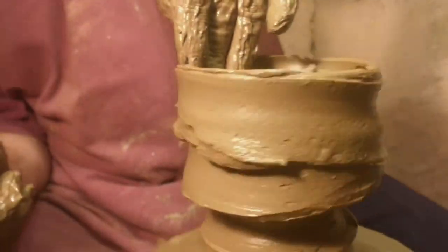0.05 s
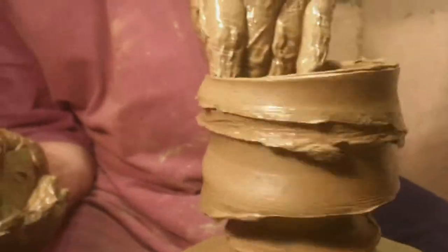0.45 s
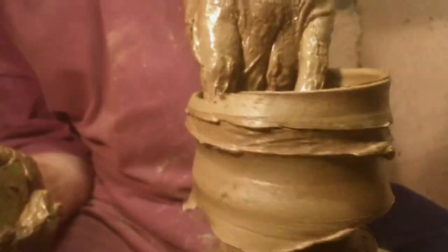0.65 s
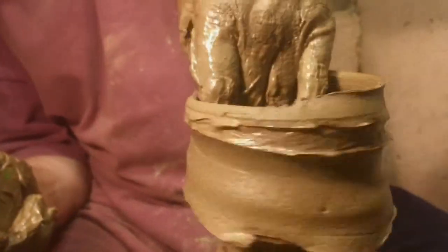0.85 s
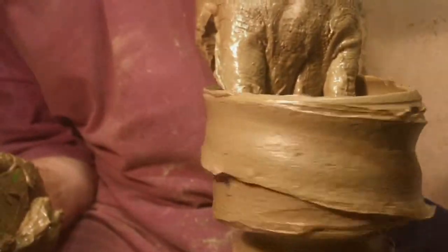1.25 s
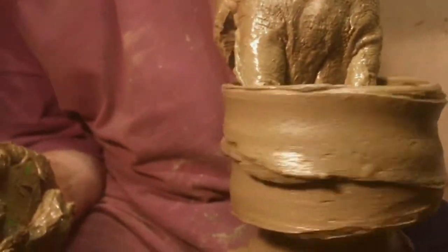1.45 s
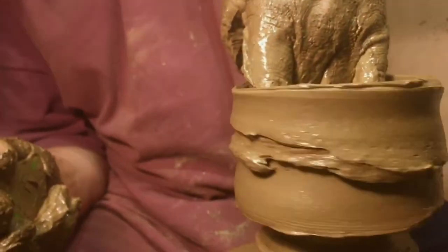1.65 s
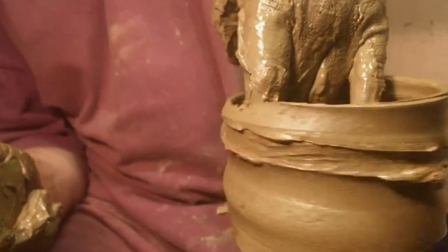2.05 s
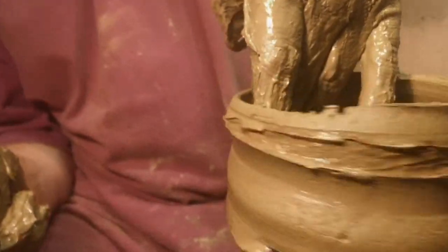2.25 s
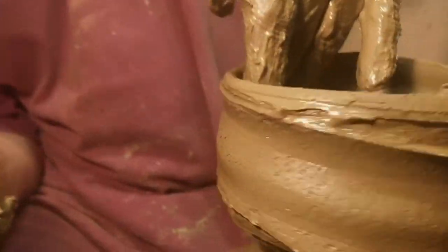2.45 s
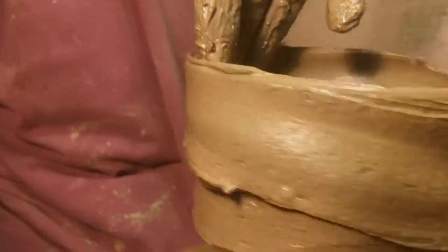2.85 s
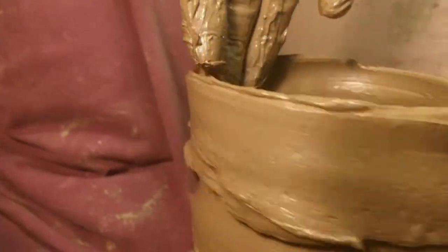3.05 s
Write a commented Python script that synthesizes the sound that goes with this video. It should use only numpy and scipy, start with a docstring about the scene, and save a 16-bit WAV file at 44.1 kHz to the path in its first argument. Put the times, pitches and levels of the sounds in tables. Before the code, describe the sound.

Wet clay is worked on a slowly turning potter's wheel, heard up close. Flurries of soft taps surround two dull knocks with brief gritty scuffs, while the wheel rumbles quietly under a thin hiss.

```python
"""Wet clay on a potter's wheel

Close to a slowly turning wheel, microphone in the hand. Working the clay gives flurries of soft taps,
two dull knocks, short scuffs and one tiny squeak. The blows travel through solid parts as bending
waves, treble first, so each falls in pitch. Behind them the wheel rumbles quietly under a thin hiss."""
import sys
import numpy as np
from scipy import signal
from scipy.fft import rfft, irfft
from scipy.io import wavfile
from scipy.ndimage import uniform_filter1d

SR = 44100
rng = np.random.default_rng(int(sys.argv[2]) if len(sys.argv) > 2 else 0)


def log_audio(samples):
    """Write samples as a 16-bit WAV file to the path given in sys.argv[1]."""
    # one column per channel
    frames = np.atleast_2d(samples).T
    # limit to full scale, then quantise
    limited = np.clip(frames, -1, 1)
    pcm = np.round(limited * 32767).astype(np.int16)
    wavfile.write(sys.argv[1], SR, pcm)


N = 136710

# spectrum of the wheel's rumble and shudder: f/Hz, level/dB
WHEEL_COLOUR = [(20, -52), (40, -24), (60, 0), (90, 2), (125, 0), (170, -3.5), (240, -3), (320, -7),
                (420, -13), (520, -13.5), (680, -18.5), (900, -40.5), (1500, -41), (3000, -58),
                (16000, -89)]
# spectrum of wet clay fizzing and splashing: f/Hz, level/dB
FIZZ_COLOUR = [(1000, -16), (3000, 2), (4400, -1), (5800, -0.5), (7500, -14), (10000, -18), (15000, -18)]
BEND_MS, KNOCK_BEND_MS = 0.844, 0.9  # travel time of a bending wave at 1 kHz
BUILD_UP_S = 0.0083  # rise of the rattle, boom and reflections after a blow


def undb(db):
    """Decibels to gain."""
    return 10 ** (np.asarray(db) / 20)


def colour(points, f):
    """Gain at the frequencies f of a spectrum of (f/Hz, level/dB) points."""
    hz, db = np.array(points, float).T
    return undb(np.interp(np.log(f + 1e-9), np.log(hz), db))


def noise(points):
    """Noise of a given colour, rms 1."""
    f = np.arange(N // 2 + 1) * SR / N
    y = irfft(rfft(rng.standard_normal(N)) * colour(points, f), N)
    return y / y.std()


def ring(hz, width_hz):
    """Noise ringing in one resonance, rms 1."""
    y = signal.lfilter(*signal.iirpeak(hz, hz / width_hz, fs=SR), rng.standard_normal(N))
    return y / y.std()


def walk(rate_hz):
    """Smooth random wander, spread near 1."""
    hold = int(SR / rate_hz)
    steps = rng.standard_normal(2048)[np.arange(N) // hold]
    return uniform_filter1d(uniform_filter1d(steps, hold), hold) * np.sqrt(2)


def curve(points):
    """Gain over time from (t/s, level/dB) points."""
    return undb(np.interp(np.arange(N) / SR, *np.array(points).T))


def fade(t, t60):
    """Exponential decay from t = 0, down 60 dB after t60 seconds."""
    return (t >= 0) * np.exp(-np.log(1000) * np.maximum(t, 0) / t60)


def add(out, start, sound):
    """Mix a sound in at a time in seconds."""
    i = int(round(start * SR))
    out[i:i + len(sound)] += sound[:N - i]


def blow(points, contact_ms, bend_ms, size=4096):
    """One push, peak 1: longer contact is duller; bending waves lag as 1 / sqrt(f), so it chirps down."""
    f = np.arange(size // 2 + 1) * SR / size
    khz = f / 1000
    gain = colour(points, f) / np.sqrt(1 + (khz * contact_ms) ** 10)
    cepstrum = irfft(np.log(gain + 1e-6))
    minimum_phase = np.exp(rfft(2 * cepstrum[:size // 2], size) - cepstrum[0])
    lead_ms = min(0.48, bend_ms) / 4  # brings the whole chirp forward
    lag_cycles = 2 * bend_ms * np.sqrt(khz) - lead_ms * khz
    y = irfft(minimum_phase * np.exp(-2j * np.pi * lag_cycles))[:size // 2]
    return y / np.abs(y).max()


def wheel():
    """The turning wheel rumbles unevenly and keeps a few resonances ringing."""
    # course of the rumble: t/s, level/dB
    rumble_level = [(0, -57), (.15, -55), (.3, -53), (.5, -53.5), (.63, -60), (.72, -58), (.87, -57),
                    (1.07, -59.5), (1.16, -57.5), (1.3, -61.5), (1.5, -54.5), (1.72, -58.5), (2, -59.5),
                    (2.3, -58.5), (2.45, -54.5), (2.7, -55.5), (2.83, -51.5), (3.1, -56.5)]
    # wheel resonances: f/Hz, width/Hz, level/dB relative to that course
    resonances = [(98.3, 15, -11.5), (125.5, 9.5, -9), (310.8, 10, -12), (367.3, 14, -14), (420, 13, -17.5),
                  (1621, 70, -29)]
    flutter_db = 2.5
    rumble = undb(-1.5) * noise(WHEEL_COLOUR) * undb(flutter_db * walk(rate_hz=39.92))
    ringing = sum(undb(db) * ring(hz, width) for hz, width, db in resonances)
    return curve(rumble_level) * (rumble + ringing)


def hiss():
    """Thin, flickering hiss that swells twice: full-bodied at the start, brighter near the end."""
    # spectra of the steady bed and the two swells: f/Hz, level/dB
    bed_colour = [(100, 9.5), (1000, 6.5), (1900, 4.5), (3000, 1), (5000, -1.5), (7600, -1.5), (8700, -7),
                  (10200, -1), (11000, -5), (12300, -2.5), (13500, -7), (15500, -2.5)]
    full_colour = [(200, -24), (1000, 7), (1500, 6), (1800, 10.5), (2200, 5), (3000, 6), (4200, 0.5),
                   (6000, 1.5), (7800, 0), (8500, -1.5), (12000, -1), (15500, -7)]
    bright_colour = [(200, -11), (1000, 8.5), (2600, 3.5), (4200, -1), (6000, 3.5), (7900, 7), (8300, -2),
                     (12000, 1), (15500, 0)]
    # course of each swell: t/s, level/dB
    full_level = [(0, -68), (.11, -69), (.17, -67), (.22, -73), (.28, -93), (.4, -130)]
    bright_level = [(2.5, -120), (2.66, -88), (2.73, -76.5), (2.79, -70), (2.89, -73.5), (2.96, -70),
                    (3.02, -75.5), (3.1, -99)]
    bed_db, flicker_db = -73, 1.13
    swells = curve(full_level) * noise(full_colour) + curve(bright_level) * noise(bright_colour)
    return (undb(bed_db) * noise(bed_colour) + swells) * undb(flicker_db * walk(rate_hz=150))


def taps():
    """Each tap is a dull falling thud with a small tick on top; reflections trail it briefly."""
    # soft handling taps: t/s, thud level/dB, contact/ms, tick level/dB
    touches = [(0.018, -37.5, 1.55, -51), (0.033, -45, 2.25, -63), (0.039, -38, 1.9, -56),
               (.053, -38, 1.6, -56), (0.062, -49, 1.9, -68), (.201, -43.5, 1.45, -59),
               (0.206, -39, 1.86, -64), (0.22, -40, 1.8, -63), (.232, -38.5, 1.64, -62),
               (0.2514, -30.5, 1.7, -54), (.271, -35, 1.7, -73), (0.304, -34.5, 1.83, -53),
               (0.3117, -41, 2.1, -49.5), (0.326, -37, 2.1, -69), (0.335, -46, 1.3, -70),
               (0.3514, -33.5, 2, -65), (0.4965, -36, 1.5, -49), (.513, -34.5, 1.33, -49),
               (0.545, -39.5, 1.75, -57), (0.66, -38.5, 1.63, -57), (1.129, -49.5, 1.6, -74),
               (1.457, -44.5, 2.4, -70), (2.083, -42.5, 1.93, -63), (2.117, -52, 1.4, -71),
               (2.157, -45, 3.1, -71), (2.176, -44.5, 3.45, -70), (2.217, -47, 1.46, -65),
               (2.34, -42.5, 4.4, -66), (2.384, -48.5, 1.7, -68), (2.4109, -35.5, 1.68, -56.5),
               (2.426, -39.5, 1.65, -60), (2.434, -37.5, 2.2, -58), (2.443, -42, 1.54, -67),
               (2.451, -41, 1.35, -58), (2.4597, -35.5, 1.6, -58), (2.51, -29.5, 1.67, -53),
               (2.518, -42, 1.7, -69), (2.552, -37.5, 1.78, -66), (2.572, -35.5, 1.4, -54),
               (2.5797, -43, 1.3, -46.5), (2.589, -38.5, 2.9, -48.5), (2.604, -35.5, 1.5, -58),
               (2.645, -43.5, 1.86, -60), (2.652, -43.5, 3.6, -57), (2.6905, -42, 1.43, -56),
               (2.698, -41, 1.36, -59), (2.7635, -36, 2.06, -64), (2.786, -41, 1.83, -67),
               (2.800, -40, 1.54, -58), (2.808, -38.5, 3.1, -62), (2.820, -42, 2.05, -63),
               (2.858, -44.5, 1.7, -73), (2.9098, -37, 1.77, -68), (2.931, -39, 1.48, -73),
               (2.937, -39, 1.43, -64), (2.943, -42, 1.05, -51.5), (2.989, -38, 2.5, -64),
               (3.027, -37, 1.7, -60)]
    # spectra of the thud and the tick: f/Hz, level/dB
    thud_colour = [(10, -59), (25, -40.5), (50, -17.5), (90, 1), (160, 4.5), (300, 0.5), (450, -2),
                   (1000, -8), (16000, -20.5)]
    tick_colour = [(30, -41), (100, -9), (500, 5), (900, -0.5), (1600, 2), (2600, -13), (4000, -24),
                   (8000, -24), (16000, -53)]
    out = np.zeros(N)
    bends = BEND_MS * np.exp(0.12 * rng.standard_normal(len(touches)))  # taps land at different distances
    for (start, thud_db, contact_ms, tick_db), bend_ms in zip(touches, bends):
        add(out, start, undb(thud_db) * blow(thud_colour, contact_ms, bend_ms))
        add(out, start, undb(tick_db) * blow(tick_colour, 0, bend_ms))
    t = np.arange(SR // 4) / SR
    tail = rng.standard_normal(len(t)) * fade(t, t60=0.15) * (1 - np.exp(-t / BUILD_UP_S))
    reflections = signal.fftconvolve(out, tail / np.linalg.norm(tail))[:N]
    return out + undb(-27) * reflections


def knocks():
    """Two hard blows make the frame boom and rattle and the wet clay splash; softer pushes thud low."""
    # hard blows: t/s, level/dB, contact/ms, rattle level/dB, boom level/dB, splash level/dB
    hits = [(0.438, -18.5, 0.4, -30, -40, -64), (1.5735, -25, 0.37, -36, -45.5, -76)]
    # soft low thuds, some just after the knocks, others as a scuff pushes and lets go:
    # t/s, level/dB, contact/ms
    soft_thuds = [(0.4443, -38.5, 0.98), (0.451, -41, 1.1), (0.458, -34, 1.35), (0.467, -38, 4.4),
                  (0.478, -37, 4.1), (.511, -46, 5.1), (1.5857, -33.5, 0.89), (1.595, -34, 1.6),
                  (1.621, -43, 6.8), (1.642, -37, 1.83), (1.646, -41, 6.9)]
    # modes of the frame: f/Hz, level/dB relative to the boom, t60/s
    frame_modes = [(95.4, 1.5, 0.27), (118.8, -7, 0.37), (199, -5.5, 0.21), (254, -10, 0.13),
                   (490, -6, 0.053), (760, -3, 0.064)]
    # spectra of the knock and the rattle: f/Hz, level/dB
    knock_colour = [(10, -55), (25, -41), (60, 0.5), (110, 4), (180, 3.5), (350, -1), (550, -7.5),
                    (900, -13.5), (1500, -21), (3000, -32.5), (6000, -31), (16000, -13)]
    rattle_colour = [(20, -45), (45, -36), (90, 8), (300, 6.5), (600, 4), (1100, -0.5), (2000, -11),
                     (3200, -27), (6500, -44), (10000, -56), (16000, -62)]
    out, rattle, splash = np.zeros(N), noise(rattle_colour), noise(FIZZ_COLOUR)
    for start, db, contact_ms, rattle_db, boom_db, splash_db in hits:
        t = np.arange(N) / SR - start
        add(out, start, undb(db) * blow(knock_colour, contact_ms, KNOCK_BEND_MS))
        boom = sum(undb(mode_db) * np.sin(2 * np.pi * hz * t) * fade(t, t60)
                   for hz, mode_db, t60 in frame_modes)
        build_up = 1 - np.exp(-np.maximum(t, 0) / BUILD_UP_S)
        out += build_up * (undb(rattle_db) * rattle * fade(t, t60=0.08) + undb(boom_db) * boom)
        out += undb(splash_db) * splash * fade(t, t60=0.094)
    for start, db, contact_ms in soft_thuds:
        add(out, start, undb(db) * blow(knock_colour, contact_ms, KNOCK_BEND_MS))
    return out


def scuffs():
    """Short gritty slips that let go with a sticky snap; fine fizz on top, a low shudder around each."""
    # slips: peak t/s, rise/s, fall/s, grit level/dB, fizz level/dB, shudder level/dB, snap level/dB
    slips = [(0.503, 0.0045, 0.0064, -59.5, -70, -44, -67),
             (1.6407, 0.0038, 0.0027, -48, -72.5, -41, -34.5),
             (2.9099, 0.0013, 0.0015, -56.5, -82, -60, -49.5)]
    # spectrum of the grit and the snap: f/Hz, level/dB
    grit_colour = [(30, -29), (100, -21), (700, -1), (1200, 9.5), (1600, 0.5), (1900, 7.5), (2600, 0.5),
                   (3100, -11.5), (4000, -28), (9000, -22.5), (16000, -46)]
    shudder_width_s = 0.0078
    out, grit, fizz, shudder = np.zeros(N), noise(grit_colour), noise(FIZZ_COLOUR), noise(WHEEL_COLOUR)
    for peak, rise, fall, grit_db, fizz_db, shudder_db, snap_db in slips:
        t = np.arange(N) / SR - peak
        envelope = np.exp(-np.abs(t) / np.where(t < 0, rise, fall))
        out += (undb(grit_db) * grit + undb(fizz_db) * fizz) * envelope
        out += undb(shudder_db) * shudder * np.exp(-(t / shudder_width_s) ** 2 / 2)
        add(out, peak, undb(snap_db) * blow(grit_colour, 0, BEND_MS))
    return out


def rubs():
    """Now and then something rubs as the wheel turns: a faint, wavering tone that arches in pitch."""
    # rubbing tones: t/s, length/s, f/Hz, pitch rise as a share of f, level/dB
    tones = [(0.718, 0.14, 386.7, 0.012, -60.5), (0.785, 0.18, 322.6, 0.0086, -61),
             (1.215, 0.19, 662, 0.073, -78), (1.701, .18, 421, 0.0075, -67)]
    out = np.zeros(N)
    waver = 1 + 0.0095 * walk(rate_hz=108)
    for start, length, hz, arch, db in tones:
        hump = np.sin(np.linspace(0, np.pi, int(length * SR)))
        pitch = hz * (1 + arch * hump) * waver[:len(hump)]
        add(out, start, undb(db) * hump * np.sin(2 * np.pi * np.cumsum(pitch) / SR))
    return out


def squeak():
    """One tiny, rough squeak of wet clay."""
    # narrow noise band of the squeak: f/Hz, level/dB
    band = [(2200, -54), (2900, -12), (3150, -8), (3500, -10), (4200, -33)]
    start_s, level_db = 1.784, -65
    return undb(level_db) * noise(band) * fade(np.arange(N) / SR - start_s, t60=0.076)


def scene():
    """Handling and background reach one microphone close to the wheel."""
    return (taps() + knocks() + scuffs() + wheel() + rubs() + squeak() + hiss())[None]


def record(dry):
    """The microphone drops the deepest bass; the recorder cuts the top steeply."""
    low_cut_hz, top_hz = 63.4, 15750
    microphone = signal.butter(2, low_cut_hz, "high", fs=SR, output="sos")
    recorder = signal.ellip(10, .1, 70, top_hz, fs=SR, output="sos")
    return signal.sosfilt(recorder, signal.sosfilt(microphone, dry))


dry = scene()
out = record(dry)
log_audio(out)
```